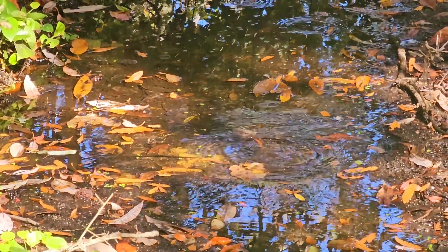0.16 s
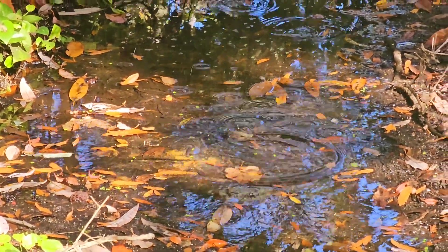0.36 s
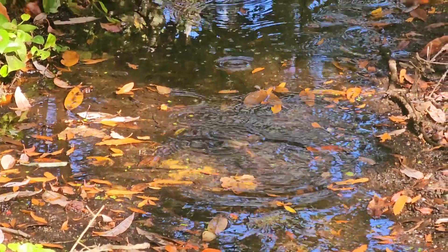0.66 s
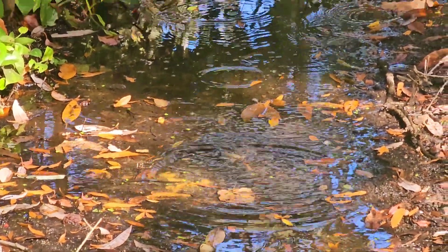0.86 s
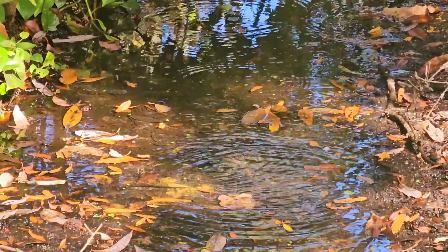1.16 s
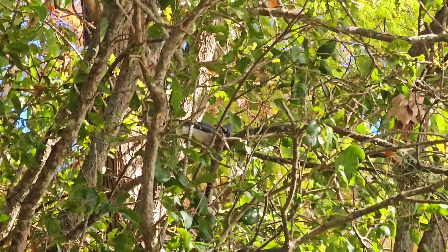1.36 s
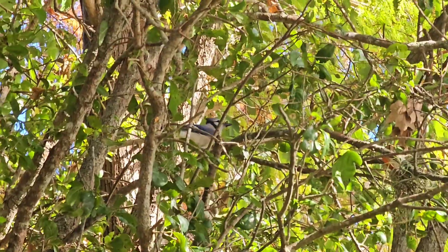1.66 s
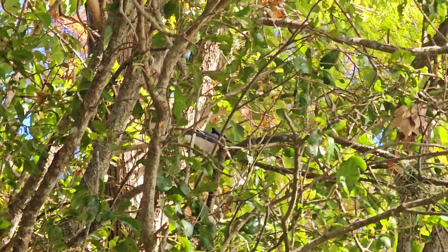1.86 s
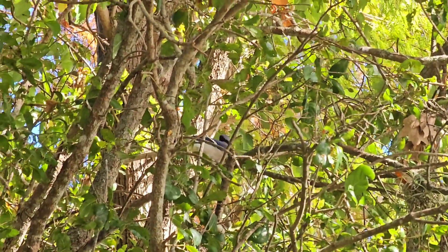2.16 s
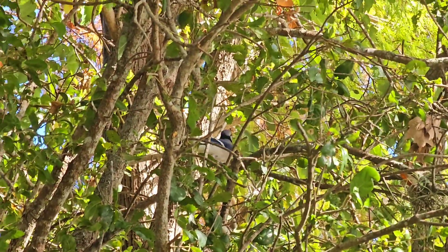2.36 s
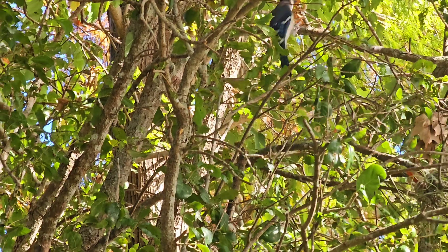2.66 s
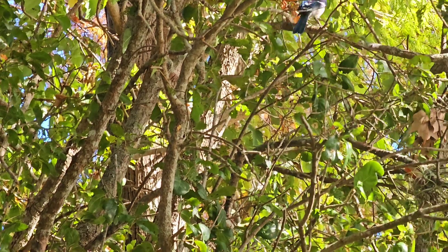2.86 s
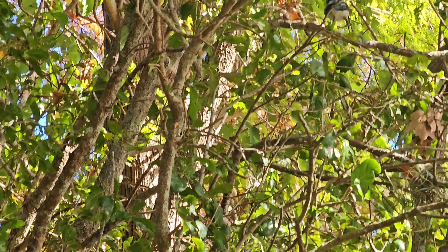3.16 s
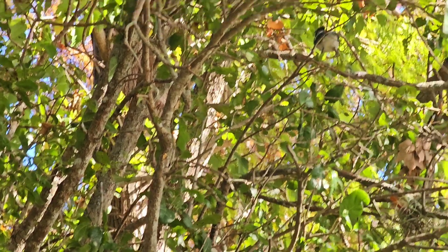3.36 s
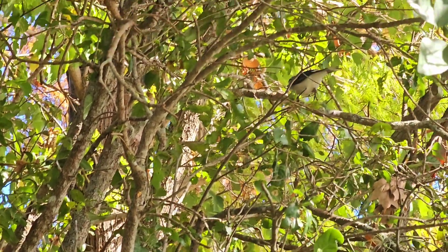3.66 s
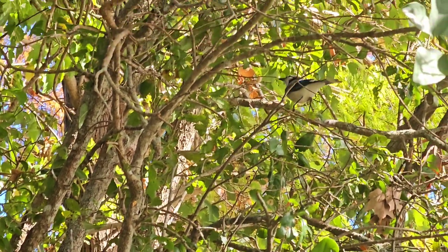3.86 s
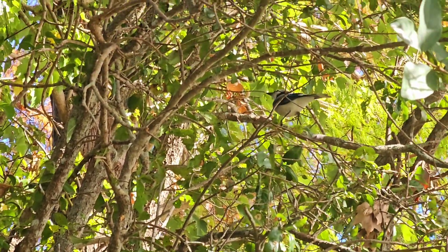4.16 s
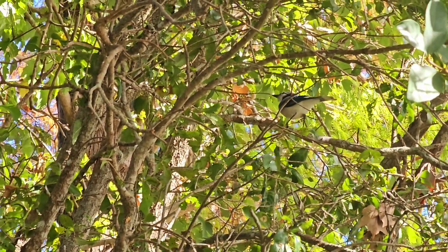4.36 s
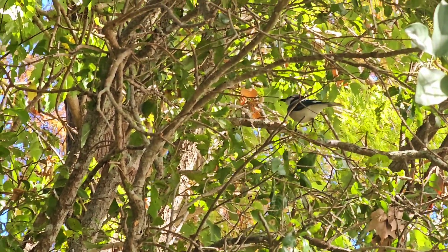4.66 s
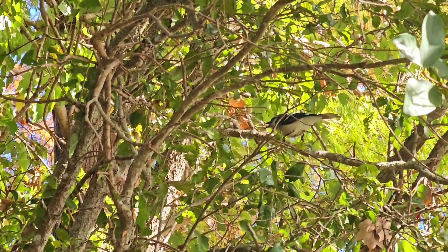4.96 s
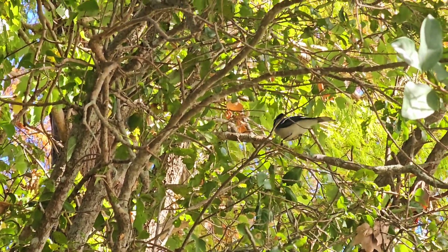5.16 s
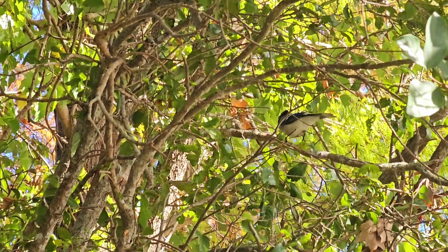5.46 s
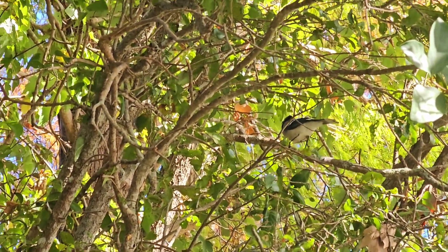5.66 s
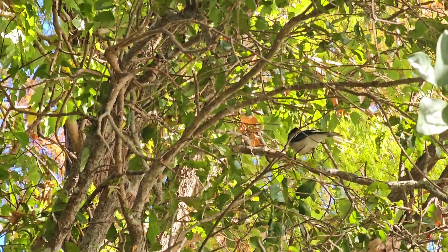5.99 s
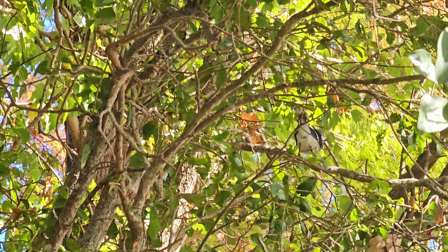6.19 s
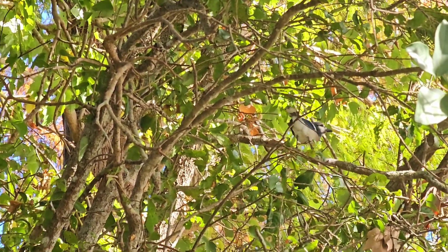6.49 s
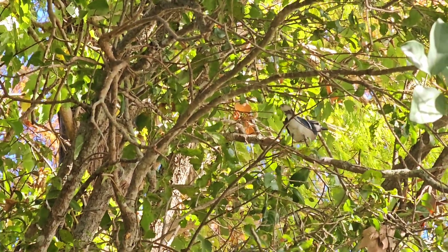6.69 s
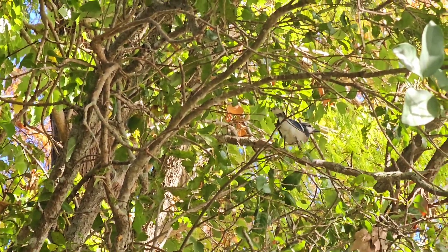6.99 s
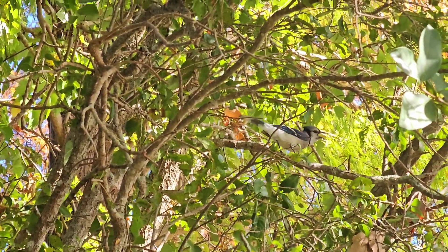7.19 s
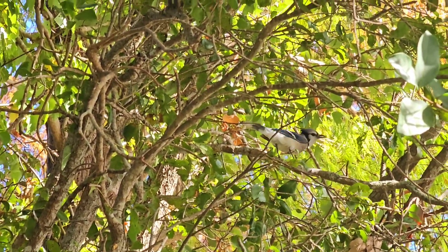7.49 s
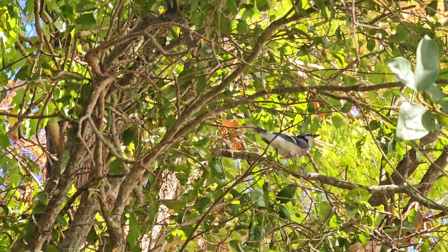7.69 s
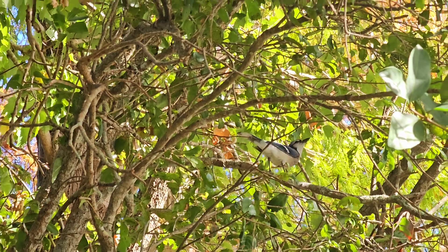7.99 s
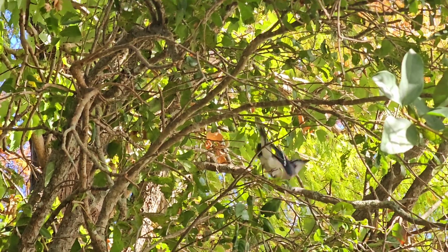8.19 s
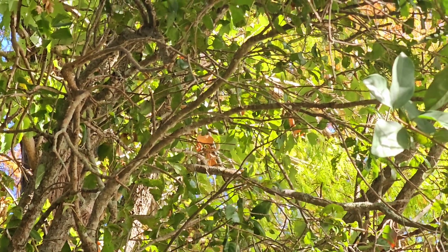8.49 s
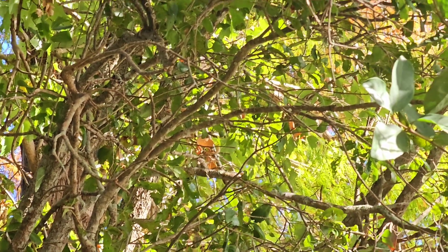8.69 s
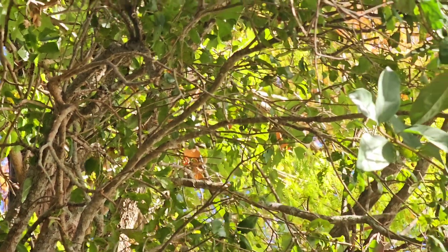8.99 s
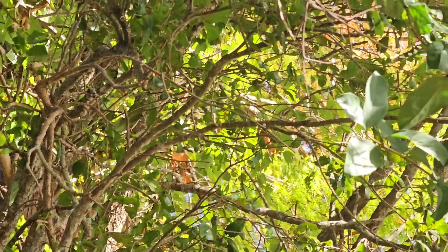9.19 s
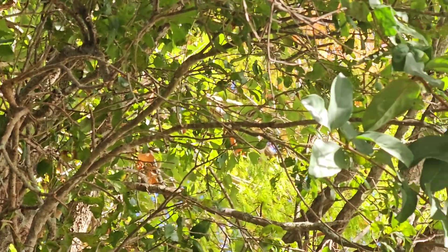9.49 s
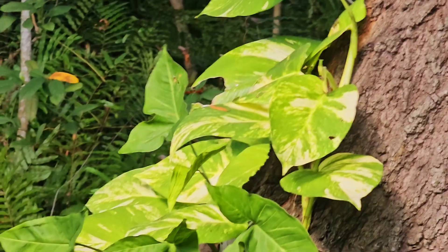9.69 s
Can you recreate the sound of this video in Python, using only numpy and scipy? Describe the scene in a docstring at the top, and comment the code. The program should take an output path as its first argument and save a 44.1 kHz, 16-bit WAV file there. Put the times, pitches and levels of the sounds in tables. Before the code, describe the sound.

Quiet outdoor air by a pond opens with a soft low rumble and barely audible ticks. A small click marks an abrupt cut to a tree, where the air changes and a jay gives six harsh, falling, nasal calls, each ending in a rasp. Short woodland echoes follow each one. Distant drone and very faint leaf breeze continue; the last call's echo is cut off as the location changes. Stereo microphone, bird at some distance.

```python
"""Six harsh, falling calls of a blue jay ring from a tree in still woods, over a far low rumble.
Each call scoops up, slides down as a nasal stack of harmonics and breaks into a rasp of irregular snaps;
scattered echoes from trunks and leaves throw it back. Shaped noise makes the air, rumble, drone and breeze.
The air of a pond's edge opens the scene, a click jumps to the tree, and near the end the air changes again."""
import sys
import numpy as np
from scipy import signal
from scipy.fft import rfft, irfft
from scipy.io import wavfile
from scipy.ndimage import uniform_filter1d

SR = 44100
rng = np.random.default_rng(int(sys.argv[2]) if len(sys.argv) > 2 else 0)


def wav_out(sig):
    """Save sig, one row per channel (or a flat mono array), as 16-bit PCM at SR to the path in sys.argv[1]."""
    wavfile.write(sys.argv[1], SR, np.round(np.clip(np.atleast_2d(sig).T, -1, 1) * 32767).astype(np.int16))


N = 433944
TIME, BINS = np.arange(N) / SR, np.fft.rfftfreq(N, 1 / SR)
TREE_S, LEAVE_S = 1.2666, 9.649  # when the air becomes that of the tree, and when it changes again

# Colour of the still air by the pond. Each row: frequency in Hz, relative density in dB per Hz.
POND_AIR_COLOUR = [(15, -37), (25, -6), (49, -3.5), (107, -2.5), (144, -18), (209, -11), (253, -8.5),
                   (289, -20), (895, -24), (1140, -31), (1270, -29), (1900, -43.5), (2170, -44),
                   (8580, -60), (15500, -58)]
# Colour of the still air by the tree. Each row: frequency in Hz, relative density in dB per Hz.
TREE_AIR_COLOUR = [(12, -28), (20, -20.5), (49, 3.5), (80, -5), (109, -2.5), (144, -13), (213, -14.5),
                   (282, -8.5), (324, -16), (767, -19), (1410, -25), (2610, -37.5), (5530, -47.5),
                   (7730, -60.5), (15500, -64)]
# Colour of the still air at the last spot. Each row: frequency in Hz, relative density in dB per Hz.
LAST_AIR_COLOUR = [(15, -35), (40, -6), (110, 0), (180, -19), (400, -17.5), (950, -17), (1300, -23),
                   (2500, -33), (5500, -56), (8000, -68), (15000, -75)]
# How alike noise is on the two sides. Each row: frequency in Hz, left-right correlation (1 is identical).
SIDE_LIKENESS = [(30, 0.92), (150, 0.97), (280, 0.93), (500, 0.6), (1000, 0.019), (2000, 0.071),
                 (15000, 0.017)]
RUMBLE_DB = -47.5  # the steady part of the deep rumble
# Swells of the deep rumble. Each row: peak time in seconds, seconds from peak to 1/e, peak level in dB.
SWELLS = [(0.05, 0.24, -38), (5.6, 0.9, -42), (6.6, 0.24, -40), (7.09, 0.092, -30.5), (8.3, 0.81, -45.5),
          (9.5, .3, -44)]
# Far traffic drone near 200 Hz. Each row: time in seconds, level in dB.
DRONE_LEVEL = [(0, -44.5), (.6, -41), (1.26, -42.5), (1.27, -32.5), (2.2, -37), (2.4, -40.5), (4.3, -45.5),
               (5.85, -35.5), (6.35, -47), (7.25, -40), (9.55, -43.5), (9.84, -50.5)]
# Breeze in the leaves. Each row: time in seconds, level in dB.
BREEZE_LEVEL = [(0, -51.5), (.45, -53.5), (.8, -58.5), (1.3, -58.5), (2.5, -58), (4.4, -61), (6, -63.5),
                (7.8, -63), (9.84, -62.5)]
# Colour of that breeze. Each row: frequency in Hz, relative density in dB per Hz.
LEAF_COLOUR = [(500, -19), (1500, 13.5), (3000, 6.5), (5500, 5), (7000, -5.5), (10700, -14.5),
               (11600, -1.5), (13500, -6.5), (15500, -8)]
# Faint ticks, chips and soft puffs.
# Each row: start in seconds, length in seconds, centre in Hz, width in Hz, level in dB before its fades.
SMALL_PUFFS = [(.378, 0.023, 4500, 6000, -58), (0.44, 0.012, 9000, 9000, -57),
               (0.514, .025, 5500, 7000, -63), (3.934, 0.21, 3380, 1500, -50.5),
               (4.367, .025, 5300, 1100, -56), (4.368, .012, 13500, 4000, -62),
               (8.233, 0.032, 3200, 1200, -56)]
# Long ring of the woods. Each row: frequency in Hz, time to fall 60 dB in seconds.
WOODS_RING = [(1500, 0.22), (2800, 0.74), (3600, 0.66), (4400, 0.72), (5500, 0.54), (8000, 0.65),
              (14000, 0.29)]
# Straight path against the echoes. Each row: frequency in Hz, direct over echoes in dB.
DIRECT_OVER_ECHOES = [(1800, -1.5), (2900, 5), (3800, 0.5), (4600, 1.5), (5500, -12), (7000, 8), (9000, -5),
                      (14000, 2)]
# Colour of the jay on the two sides. Each row: frequency in Hz, left over right in dB.
SIDE_BALANCE = [(1000, 7), (1900, 1.5), (2900, -4), (3800, -3), (4500, -2), (5400, -10.5), (7000, 3),
                (8800, 10.5), (10000, 17.5), (11500, -7), (13500, 11.5), (15500, -10)]
# The jay's calls. Each row: start in seconds, voice break in seconds, end in seconds, top pitch in Hz,
# settled pitch in Hz, seconds to be halfway down, power of lingering at the top, 4th harmonic in dB,
# its swell in dB per second, harmonics below it in dB, harmonics above it in dB, rasp in dB, and
# left over right in dB. The three harmonic levels are group levels, before each harmonic's own offset.
CALLS = [(1.754, 1.98, 2.038, 999, 895.4, 0.11, 4.2, -16, 5, -37, -34, -20.5, 0.29),
         (3.428, 3.618, 3.702, 1002, 903, 0.078, 2.95, -21, -39, -38, -34, -20, 1),
         (4.717, 4.93, 4.998, 995.4, 886, 0.11, 4.04, -18.5, -25, -36.5, -34.5, -20.5, 0.16),
         (6.115, 6.33, 6.416, 982, 896, 0.099, 3.2, -16.5, 17, -34.5, -34, -21.5, 1),
         (7.103, 7.281, 7.373, 1022, 838.8, .115, 1.7, -15.5, -5.5, -35.5, -31, -22.5, 0.83),
         (9.322, 9.491, 9.590, 1001, 878, 0.099, 3.74, -16, 10, -36, -36.5, -24, -1.1)]
# The harmonic stack. Each row: harmonic number, offset within its group in dB.
HARMONIC_OFFSETS = [(1, -21.5), (2, -3.5), (3, 5), (4, -1.5), (5, -8.5), (6, -2), (7, -4.5), (8, -7),
                    (9, -10), (10, -11), (11, -24.5), (12, -20), (13, -16), (14, -13.5), (15, -23),
                    (16, -18), (17, -25)]
# Throat resonances heard in the rasp. Each row: frequency in Hz, width in Hz, relative gain in dB.
THROAT_RESONANCES = [(1615, 49, -2), (2260, 350, -7), (2780, 59, -26), (3620, 800, 8.5), (4372, 210, 16.5),
                     (4730, 470, 9.5), (5200, 460, 3.5), (7070, 510, -2), (8700, 970, -15.5),
                     (12500, 4600, -23)]

# opening squeak of each call
CHIRP_HZ, CHIRP_RISE_HZ, CHIRP_S, CHIRP_DB = 2750, 1000, 0.011, -29
# in its last moments the pitch sags once more
SAG_HZ, SAG_S = 79.25, 0.075
# group levels drift about this age of the call: the low harmonics fade, the high ones grow
MIDDLE_S, LOW_FADE_DB_PER_S, HIGH_GROW_DB_PER_S = 0.14, 45, 11
# drops of the ringing harmonic and the high ones as the voice breaks
RING_LOSS_DB, HIGH_LOSS_DB, BREAK_S = 9, 6.5, 0.043


def amp(db):
    """Decibels to gain."""
    return 10 ** (np.asarray(db) / 20)


def unit(x):
    """Scales to rms 1."""
    return x / np.sqrt(np.mean(x ** 2) + 1e-20)


def at_hz(points, hz):
    """Reads a table on a log-frequency axis."""
    f, value = np.transpose(points)
    return np.interp(np.log(hz + 1), np.log(f + 1), value)


def at_time(rows):
    """Reads a curve of levels over the whole scene."""
    s, value = np.transpose(rows)
    return np.interp(TIME, s, value)


def wander(size, rate_hz):
    """Smooth random drift of rms 1, mostly slower than the rate."""
    hz = np.fft.rfftfreq(size, 1 / SR)
    smooth = rfft(rng.standard_normal(size)) / (1 + (hz / rate_hz) ** 4)
    return unit(irfft(smooth, size))


def resonate(x, hz, width_hz):
    """A steep resonance of gain 1: two equal poles."""
    pole = np.exp((2j * np.pi * hz - np.pi * width_hz) / SR)
    return 2 * signal.lfilter([(1 - abs(pole)) ** 2], np.poly([pole, pole]), x).real


def ramp(t, start, length):
    """A smooth step from 0 to 1."""
    return np.sin(np.pi / 2 * np.clip((t - start) / length, 0, 1)) ** 2


def add(mix, s, sound):
    """Adds a stereo sound at a time."""
    part = mix[:, round(s * SR):][:, :sound.shape[1]]
    part += sound[:, :part.shape[1]]


def air_noise(gain):
    """Stereo noise of rms 1 with the given spectrum, nearly alike on both sides in the bass."""
    a, b = rfft(rng.standard_normal((2, N)))
    same = np.clip(at_hz(SIDE_LIKENESS, BINS), -1, 1)
    right = same * a + np.sqrt(1 - same ** 2) * b
    return unit(irfft(np.array([a, right]) * gain, N))


def hump(hz, width_hz):
    """Noise gathered around one low frequency."""
    return air_noise(1 / (1 + abs((BINS - hz) / width_hz) ** 3))


def patchy(x):
    """Distant sound arrives unevenly: small drifting patches in time and frequency."""
    z = signal.stft(x, SR, nperseg=1024)[2]
    patches = rng.standard_normal(z.shape[1:])
    patches = uniform_filter1d(patches, 5, 0)  # across frequency
    patches = unit(uniform_filter1d(patches, 7, 1))  # along time
    return signal.istft(z * amp(2.2 * patches - 0.4), SR, nperseg=1024)[1][:, :N]


def still_air():
    """Air of the three spots in turn, each a noise with its own colour and level."""
    bass_db = -4 / (1 + (BINS / 75) ** 4)  # thins the deepest bass of the first two
    pond = amp(-37) * air_noise(amp(at_hz(POND_AIR_COLOUR, BINS) + bass_db))
    tree = amp(-39.07) * air_noise(amp(at_hz(TREE_AIR_COLOUR, BINS) + bass_db))
    last = amp(-37) * air_noise(amp(at_hz(LAST_AIR_COLOUR, BINS)))
    return patchy(np.select([TIME < TREE_S, TIME < LEAVE_S], [pond, tree], last))


def deep_rumble():
    """Noise near 59 Hz whose slow swells add their power to a steady level."""
    power = amp(RUMBLE_DB) ** 2
    for peak_s, half_s, db in SWELLS:
        swell = amp(db) * np.exp(-((TIME - peak_s) / half_s) ** 2)
        power = power + swell ** 2
    return hump(58.8, 13.3) * np.sqrt(power)


def traffic_drone():
    """Far traffic blurs into a narrow band of noise with a changing level."""
    return hump(205.3, 59.3) * amp(at_time(DRONE_LEVEL))


def leaf_breeze():
    """Light breeze in the leaves: bright noise with a slowly changing level."""
    return air_noise(amp(at_hz(LEAF_COLOUR, BINS))) * amp(at_time(BREEZE_LEVEL))


def background():
    """Still air, deep rumble, far drone and breeze together."""
    return still_air() + deep_rumble() + traffic_drone() + leaf_breeze()


def small_puffs():
    """Short bursts of noise through a resonance, faded in and out."""
    mix = np.zeros((2, N))
    for s, length, hz, width_hz, db in SMALL_PUFFS:
        size = round(length * SR)
        puff = unit(resonate(rng.standard_normal((2, size)), hz, width_hz))
        add(mix, s, amp(db) * puff * np.hanning(size))
    return mix


def jump_click():
    """The click at the jump to the tree: a sudden negative step that dies away."""
    mix = np.zeros((2, N))
    step = -amp(-24) * np.exp(-TIME[:SR // 100] / 0.0014)
    add(mix, TREE_S, np.array([step, step]))
    return mix


def woods():
    """Response on each side: the straight path, scatter from leaves, echoes off trunks and a faint long ring."""
    t, hz = np.arange(SR) / SR, np.fft.rfftfreq(SR, 1 / SR)
    gap_s = 0.013
    sparse = rng.standard_normal((2, SR)) * (rng.random((2, SR)) < 700 / SR)  # about 700 echoes a second
    trunks = sparse * ramp(t, gap_s, 0.0077) * amp(-60 * t / 0.26)  # falls 60 dB in 0.26 s
    leaves = sparse * (1 - ramp(t, 0.0046, 0.016))
    band_hz, frame_s, z = signal.stft(rng.standard_normal((2, SR)), SR, nperseg=256)
    decay = amp(-60 * frame_s / at_hz(WOODS_RING, band_hz)[:, None])
    far = signal.istft(z * decay, SR, nperseg=256)[1][:, :SR] * ramp(t, gap_s, 0.095)
    echoes = unit(unit(trunks) + amp(-8) * unit(leaves) + amp(-19) * unit(far)) / np.sqrt(SR)
    # the straight path reaches the left side 0.096 ms before the right
    straight = amp(at_hz(DIRECT_OVER_ECHOES, hz))
    direct = straight * np.exp(-2j * np.pi * hz * np.array([[0], [0.000096]]))
    spectrum = (direct + rfft(echoes)) / np.sqrt(1 + straight ** 2)
    # a 32-sample delay keeps ripple ahead of the direct sound from wrapping to the end
    return np.roll(irfft(spectrum, SR), 32, axis=1) * (1 - ramp(t, 0.7, 0.2))


def first_chirp(age):
    """A tiny rising squeak as the membrane starts to move."""
    progress = np.clip(age / CHIRP_S, 0, 1)
    turns = np.cumsum(CHIRP_HZ + CHIRP_RISE_HZ * progress) / SR
    envelope = np.sqrt(2 * (1 - progress ** 2)) * ramp(age, 0, 0.002)
    return amp(CHIRP_DB) * envelope * np.sin(2 * np.pi * turns)


def jay_pitch(age, length, top_hz, settled_hz, fall_s, linger):
    """The pitch lingers at the top, slides down, settles, and sags as the call gives out."""
    held = 1 / (1 + (age / fall_s) ** linger)
    giving_out = np.clip(1 - (length - age) / SAG_S, 0, 1)
    return settled_hz + (top_hz - settled_hz) * held - SAG_HZ * giving_out ** 2


def jay_levels(age, clear_s, ring_db, swell_db_per_s, below_db, above_db):
    """Group levels in dB: all drift steadily; the 4th harmonic and those above it drop at the break."""
    drift_s = np.minimum(age, clear_s) - MIDDLE_S
    broken = ramp(age, clear_s, BREAK_S)
    main_db = ring_db + swell_db_per_s * drift_s - RING_LOSS_DB * broken
    low_db = below_db - LOW_FADE_DB_PER_S * (age - MIDDLE_S)
    high_db = above_db + HIGH_GROW_DB_PER_S * drift_s - HIGH_LOSS_DB * broken
    return main_db, low_db, high_db


def nasal_tone(age, hz, clear_s, rough, levels):
    """The syrinx snaps up to pitch and sings a harmonic stack on one unsteady pitch."""
    main_db, low_db, high_db = levels
    # most unsteady in the first instants, slowly more strained, and rough again once the voice breaks
    strain = 0.004 * ramp(age, 0, clear_s)
    unsteady = 0.00089 + strain + 0.017 * (rough + 1.65 * np.exp(-age / 0.016))
    scoop = 1 - 0.32 * np.exp(-age / 0.0045)
    turns = np.cumsum(hz * scoop * (1 + unsteady * wander(len(age), 450))) / SR
    tone = np.zeros(len(age))
    for order, db in HARMONIC_OFFSETS:
        if order < 4:
            group_db = low_db
        elif order == 4:
            group_db = main_db
        else:
            group_db = high_db + 3 * wander(len(age), 120)  # each upper harmonic flutters on its own
        phase = 2 * np.pi * (order * turns + rng.random())
        tone += amp(db + group_db) * np.sqrt(2) * np.cos(phase)
    return tone * amp(-1) * ramp(age, 0, 0.026)


def throat_snaps(hz):
    """One snap a cycle at an irregular pace and of uneven strength, with breath noise."""
    cycles = np.cumsum(hz * (1 + 0.22 * wander(len(hz), 500))) / SR
    snaps = np.diff(np.floor(cycles), prepend=0)
    uneven = amp(0.98 * rng.standard_normal(len(hz)))
    return unit(snaps * uneven) + 0.47 * rng.standard_normal(len(hz))


def throat_rasp(snaps, rough, rasp_db):
    """The snaps ring the throat: a trace of fuzz at first, the full rasp once the voice breaks."""
    rasp = unit(sum(amp(db) * resonate(snaps, f, width) for f, width, db in THROAT_RESONANCES))
    return rasp * amp(rasp_db) * (rough + amp(-35))


def first_scrape(snaps, age):
    """The first cycles scrape brightly and die away."""
    scrape = unit(resonate(snaps, 5200, 1500) + 0.1 * resonate(snaps, 8500, 5000))
    return scrape * amp(-32) * ramp(age, 0, 0.004) * np.exp(-age / 0.026)


def jay_call(start, breaks, end, top_hz, settled_hz, fall_s, linger,
             ring_db, swell_db_per_s, below_db, above_db, rasp_db, balance_db):
    """The syrinx sings a falling harmonic stack, then beats irregularly and rasps."""
    age = np.arange(start, end + 0.0092, 1 / SR) - start
    length, clear_s = end - start, breaks - start
    hz = jay_pitch(age, length, top_hz, settled_hz, fall_s, linger)
    levels = jay_levels(age, clear_s, ring_db, swell_db_per_s, below_db, above_db)
    rough = ramp(age, clear_s - 0.025, 0.062)
    tone = nasal_tone(age, hz, clear_s, rough, levels)
    snaps = throat_snaps(hz)
    voice = tone + throat_rasp(snaps, rough, rasp_db) + first_scrape(snaps, age)
    gate = ramp(age, 0, 0.002) * (1 - ramp(age, length - 0.022, 0.022))
    sides = amp(np.array([[balance_db], [-balance_db]]) / 2)
    return (first_chirp(age) + voice * gate) * sides


def jay():
    """Each call passes through a fresh scatter of the woods; each side then colours it in its own way."""
    mix = np.zeros((2, N))
    for call in CALLS:
        add(mix, call[0], signal.fftconvolve(jay_call(*call), woods(), axes=1))
    tilt = amp(at_hz(SIDE_BALANCE, BINS) / 2)
    sides = np.array([tilt, 1 / tilt]) / np.sqrt((tilt ** 2 + tilt ** -2) / 2)
    return irfft(rfft(mix) * sides, N) * (TIME < LEAVE_S)  # cut off as the air changes


def scene():
    """The jay over the quiet woods."""
    return background() + small_puffs() + jump_click() + jay()


def record(dry):
    """The recorder's band limit: a steep low-pass at 15.9 kHz."""
    low_pass = signal.firwin(511, 15900, window=("kaiser", 9), fs=SR)
    return signal.oaconvolve(dry, low_pass[None], "same")


dry = scene()
out = record(dry)
wav_out(out)
```